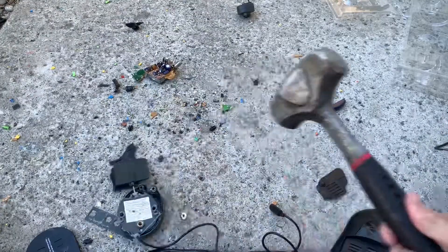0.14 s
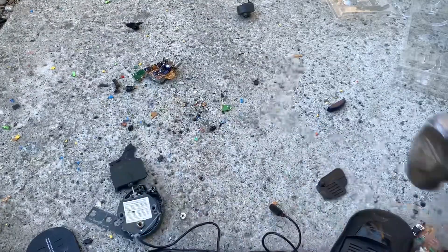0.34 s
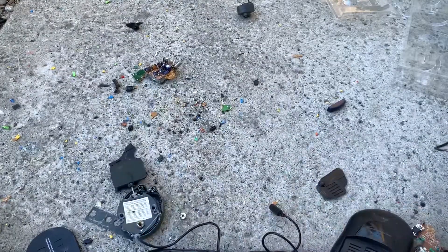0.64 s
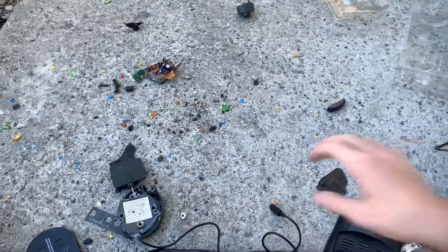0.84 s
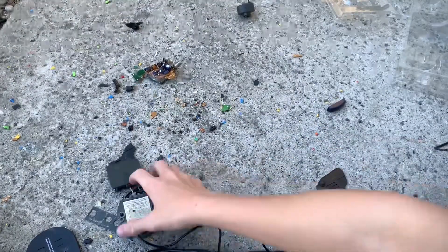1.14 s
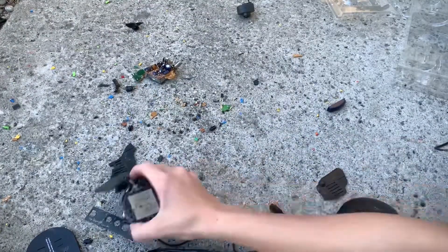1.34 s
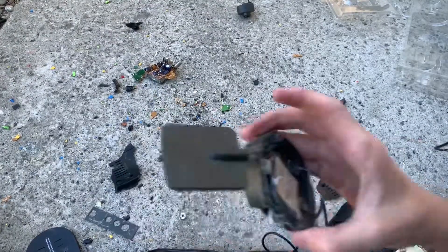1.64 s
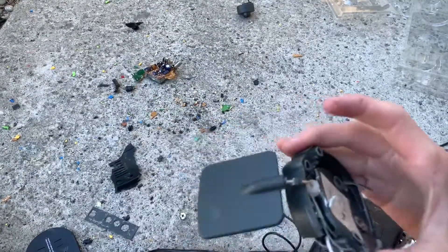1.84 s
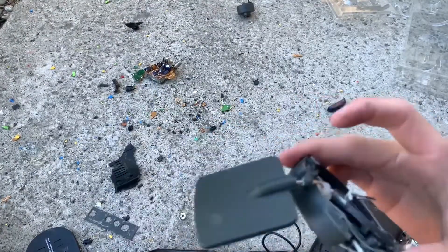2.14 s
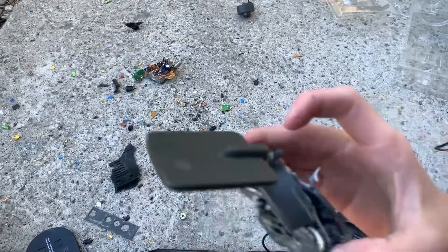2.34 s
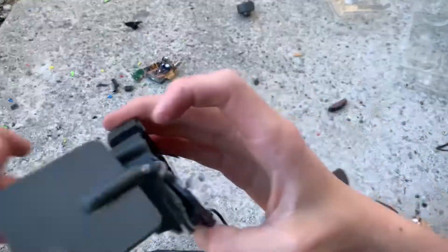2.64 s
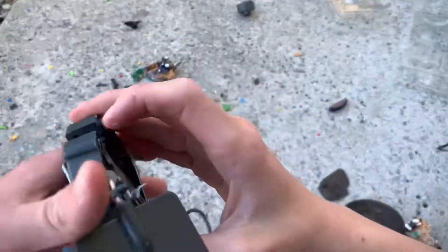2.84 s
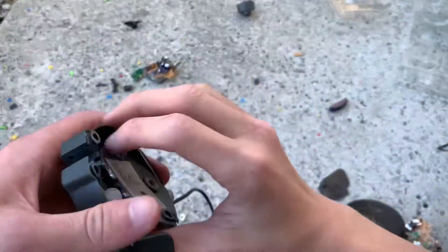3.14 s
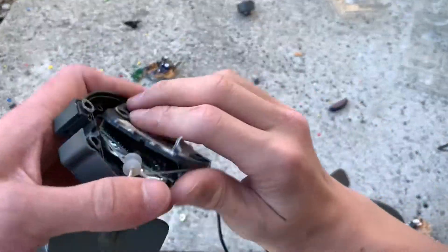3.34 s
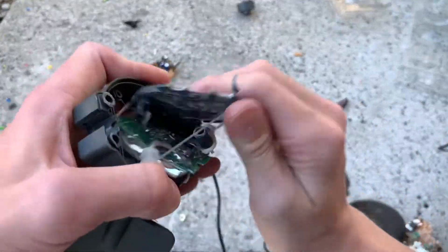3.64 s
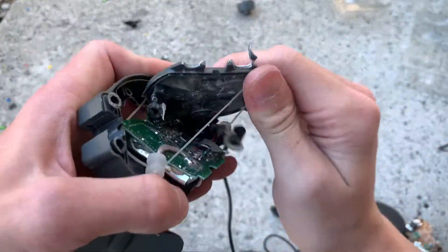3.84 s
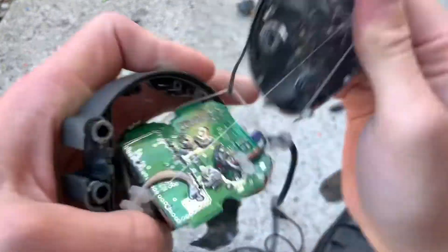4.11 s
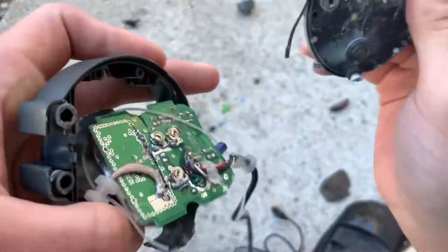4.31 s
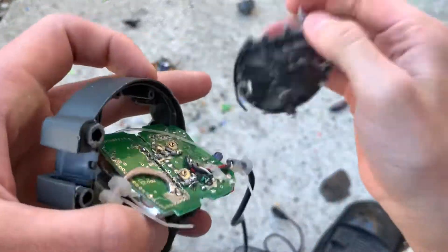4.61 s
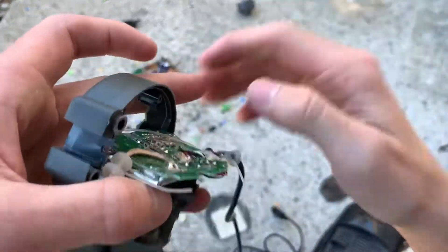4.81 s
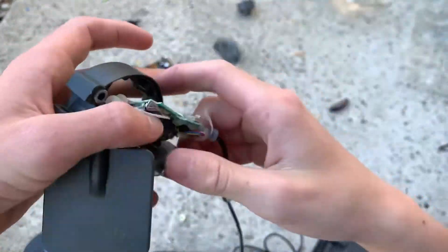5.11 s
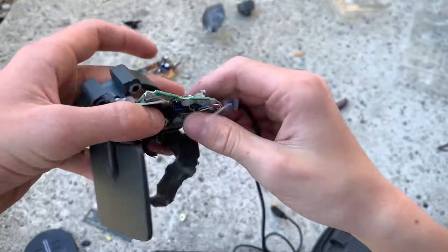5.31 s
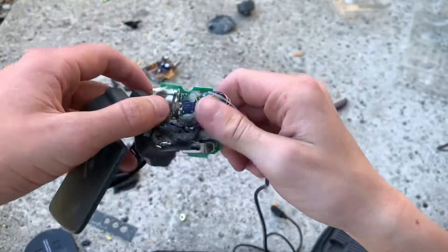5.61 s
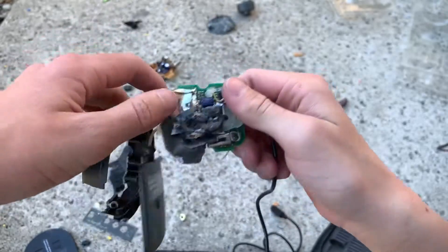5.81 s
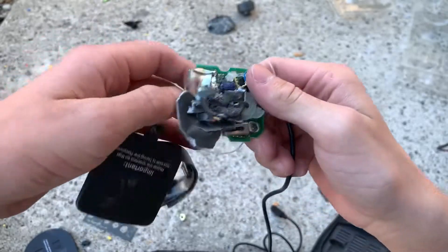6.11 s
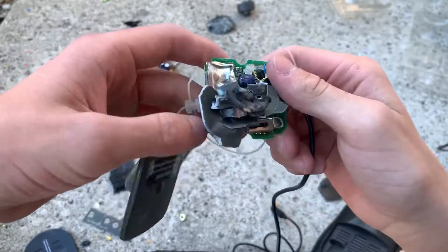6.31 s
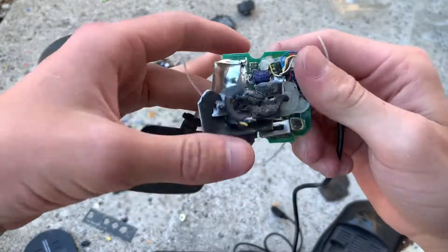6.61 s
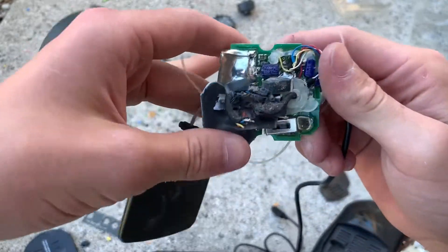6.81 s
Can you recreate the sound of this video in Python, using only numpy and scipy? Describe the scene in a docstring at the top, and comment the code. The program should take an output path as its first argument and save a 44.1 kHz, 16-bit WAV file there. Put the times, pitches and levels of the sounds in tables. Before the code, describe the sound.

A heavy hammer clunks down and scrapes on concrete, then hands rub and crack apart broken plastic, sparrows chirping over distant traffic.

```python
"""Outdoors on concrete, a hammer is laid down and rocks to rest, then two hands pull a smashed gadget apart.
Thuds with falling pitch and ringing steel make the hammer; shaped noise and tiny slips make it drag.
Close by, the plastic housing rubs, clacks and snaps and the circuit board cracks free: short bursts
of noise set panels and shards ringing. Far off, a sparrow's whistled chirps lean to the right, and
traffic rumbles as filtered noise and engine harmonics."""
import sys
import numpy as np
from scipy import signal
from scipy.fft import rfft, irfft
from scipy.io import wavfile

SR = 44100
rng = np.random.default_rng(int(sys.argv[2]) if len(sys.argv) > 2 else 0)


def wav_out(sig):
    """Save sig, one row per channel (or a flat mono array), as 16-bit PCM at SR to the path in sys.argv[1]."""
    wavfile.write(sys.argv[1], SR, np.round(np.clip(np.atleast_2d(sig).T, -1, 1) * 32767).astype(np.int16))


N = 306936
TIME = np.arange(N) / SR
CUTOFF_HZ = 16300   # top of the sound


def from_db(db):
    """Turn decibels into a gain."""
    return 10 ** (np.asarray(db) / 20)


def rms_one(x):
    """Scale a steady sound to an average (RMS) level of 1."""
    return x / np.sqrt(np.mean(x ** 2) + 1e-20)


def unit_hit(x):
    """Scale a hit to the energy of 5 ms at level 1."""
    return x * np.sqrt(.005 * SR / (np.sum(x ** 2) + 1e-20))


def in_time(rows):
    """Join table rows with straight lines over time, one curve per column."""
    s, *columns = np.transpose(rows)
    return [np.interp(TIME, s, c) for c in columns]


def at_hz(rows, hz):
    """Join table rows over frequency on a logarithmic scale, one curve per column."""
    points, *columns = np.transpose(rows)
    return [np.interp(np.log(hz + 1), np.log(points), c) for c in columns]


def colour(x, spectrum):
    """Causal (minimum-phase) filter that follows a spectrum."""
    size = 2048
    level_db = at_hz(spectrum, np.fft.rfftfreq(size, 1 / SR))[0]
    cepstrum = irfft(np.log(from_db(level_db)))
    # folding the cepstrum forward leaves no sound before the hit
    cepstrum[1:size // 2] *= 2
    cepstrum[size // 2 + 1:] = 0
    return signal.fftconvolve(x, irfft(np.exp(rfft(cepstrum))))[:len(x)]


def resonate(x, modes):
    """Resonances side by side, each (pitch [Hz], width [Hz], level [dB]); a narrow one rings longer."""
    out = 0
    for k, (hz, width, db) in enumerate(modes):
        r = np.exp(-np.pi * width / SR)
        gain = (-1) ** k * from_db(db) * (1 - r * r) / 2   # alternate signs
        feedback = [1, -2 * r * np.cos(2 * np.pi * hz / SR), r * r]
        out = out + gain * signal.lfilter([1, 0, -1], feedback, x + 1e-18)
    return out


def drift(rate):
    """Random wander: `rate` normal random values per second, joined by straight lines."""
    return np.interp(TIME * rate, np.arange(4000), rng.standard_normal(4000))


def grains(per_s, spread_db):
    """Tiny slips of uneven size at random moments."""
    sizes = from_db(spread_db * np.minimum(rng.exponential(1, N), 4))
    return rms_one(sizes * rng.standard_normal(N) * (rng.random(N) < per_s / SR))


def burst(run, decay_s, tail_db, tail_s):
    """Dense micro-fractures for `run` seconds, then a fast decay and a faint after-ring."""
    t = TIME[:SR // 8]
    after = np.maximum(t - run, 0)
    fade = np.exp(-after / decay_s) + from_db(tail_db) * np.exp(-after / tail_s)
    return rng.standard_normal(len(t)) * fade


def add(track, s, sound):
    """Mix a sound into a track, starting at s seconds."""
    at = max(round(s * SR), 0)
    track[at:at + len(sound)] += sound[:N - at]


def echoes(x, t60, build_s):
    """Diffuse scatter: noise that builds up and then fades at 60 dB per `t60` seconds."""
    t = TIME[:SR // 2]
    tail = rng.standard_normal(len(t)) * from_db(-60 * t / t60) * (1 - np.exp(-t / build_s))
    return signal.fftconvolve(x, tail / np.sqrt(np.sum(tail ** 2)))[:N]


def strokes(rows, attack_s, release_s):
    """Loudness of rubbing strokes, one curve per level column: each rises, holds and dies away."""
    power = 0
    for s, length, *levels in rows:
        rise = np.clip((TIME - s) / attack_s, 0, 1)
        fall = np.exp(-np.clip((TIME - s - length) / release_s, 0, 20))
        power = power + np.outer(from_db(levels), rise * fall) ** 2
    return np.sqrt(power)


def rasp(count=16):
    """Dense slips whose colour keeps shifting as the contact point wanders."""
    out, edges = 0, np.linspace(1000, CUTOFF_HZ, count + 1)
    slips = [grains(per_s=9000, spread_db=2.5) for _ in range(2)]
    for k, band in enumerate(zip(edges, edges[1:])):
        band_filter = signal.butter(2, band, "band", fs=SR, output="sos")
        out = out + signal.sosfilt(band_filter, slips[k % 2]) * from_db(4.5 * drift(45))
    return out


def engine(curve, orders):
    """The firing harmonics of a far engine, wavering in pitch and each drifting in level."""
    hz, db = in_time(curve)
    phase = 2 * np.pi * np.cumsum(hz * (1 + .022 * drift(30))) / SR
    harmonics = 0
    for k, level in orders:
        harmonics = harmonics + np.sqrt(2) * from_db(level + 3 * drift(14)) * np.sin(k * phase)
    return from_db(db) * harmonics


# distant traffic rumble: (time [s], level [dB])
TRAFFIC = [(0, -55.5), (0.4, -61), (1.1, -51.5), (1.72, -57.5), (1.82, -50.5), (3.3, -47), (4.1, -53),
           (5.93, -61.5), (6.0, -43.5), (6.35, -49), (6.96, -52)]
# spectra of the rumble and of the open air: (frequency [Hz], relative level [dB])
TRAFFIC_COLOUR = [(30, -20.5), (55, -6.5), (108, 0), (155, -10.5), (200, -22), (400, -30), (600, -50),
                  (3000, -100)]
AIR_COLOUR = [(320, 26.5), (550, 15.5), (900, 10.5), (2000, -6.5), (3500, -5.5), (6000, -9.5), (15000, -18)]
# an accelerating engine and a slow heavy one: (time [s], firing rate [Hz], level [dB])
ENGINE = [(1.5, 118.6, -72), (2.5, 123.5, -62.5), (3.3, 135.8, -81.5), (3.6, 144, -59), (4.1, 160, -56.5),
          (4.7, 172.1, -65.5), (5.9, 180.7, -83.5)]
DRONE = [(3.5, 42, -90.5), (3.8, 41, -68.5), (5.0, 40.84, -68.5), (6.4, 40.06, -53), (6.96, 41.29, -51)]
# harmonics of each: (multiple of firing rate, level [dB])
ENGINE_ORDERS = [(1, 0.5), (2, -3), (3, -20.5), (4, -27.5), (5, -33)]
DRONE_ORDERS = [(1, -4.5), (2, -2.5), (4, -19)]


def street(air_db=-72, low_cut_hz=50, surge_db=2):
    """Surging traffic rumble, two engines and a steady wash of open air, from noise and harmonics."""
    gain = from_db(at_hz(TRAFFIC_COLOUR, np.fft.rfftfreq(N, 1 / SR))[0])
    rumble = irfft(rfft(rng.standard_normal(N)) * gain, N)
    rumble = signal.sosfilt(signal.butter(4, low_cut_hz, "high", fs=SR, output="sos"), rumble)
    rumble = rms_one(rumble * from_db(surge_db * drift(19)))
    traffic = from_db(in_time(TRAFFIC)[0]) * rumble
    air = from_db(air_db) * rms_one(colour(rng.standard_normal(N), AIR_COLOUR))
    return traffic + air + engine(ENGINE, ENGINE_ORDERS) + engine(DRONE, DRONE_ORDERS)


# pitch arch of one syllable: (share of its length, share of top pitch)
SYLLABLE = [(0, .8), (.2, .91), (.38, 1), (.55, .98), (.76, .89), (1, .84)]
TRILL_HZ = 93.6


def syllable(top_hz, length, trill=0, second_voice_db=-19):
    """A ragged whistle that swells as it arches over; it may trill, with a weaker voice above it."""
    u = np.linspace(0, 1, round(length * SR))
    knots = np.linspace(0, 1, 20)
    wobble, flutter = [np.interp(u, knots, rng.standard_normal(20)) for _ in range(2)]
    bend = 1 + .018 * wobble + trill * np.sin(2 * np.pi * TRILL_HZ * length * u)
    arch = np.interp(u, *np.transpose(SYLLABLE))
    phase = 2 * np.pi * np.cumsum(top_hz * arch * bend) / SR
    voices = np.sin(phase) + from_db(second_voice_db) * np.sin(1.17 * phase)
    swell = np.sqrt(u * np.abs(np.sin(np.pi * u)))
    return rms_one(voices * swell * from_db(3.5 * flutter))


# full sparrow calls: (time [s], top pitch before bending [Hz], relative level [dB])
CHIRPS = [(1.246, 4585, -61), (2.642, 4820, -62.5), (4.366, 4494, -59.5), (5.227, 4670, -61.5),
          (6.546, 4566, -55.5)]
# the three falling syllables of a call:
# (delay [s], length [s], share of top pitch, level [dB], trill depth as a share of pitch)
CALL = [(0, .038, 1, -2, .01), (.042, .038, .82, 0, .015), (.074, .03, .73, -6, .11)]
# single notes, near and far: (time [s], length [s], top pitch before bending [Hz], level [dB])
PEEPS = [(2.329, .08, 3510, -84.5), (2.776, 0.034, 5300, -69), (2.806, 0.032, 6350, -65),
         (2.828, 0.041, 4840, -63.5), (2.891, 0.022, 6300, -67), (5.381, 0.091, 6340, -66),
         (5.396, 0.053, 5420, -63.5), (6.78, 0.045, 3726, -78.5)]


def sparrows(call_db=-2, wet_db=-10):
    """Whistled calls and single notes, all blurred by echoes from the walls around."""
    out = np.zeros(N)
    for s, top_hz, db in CHIRPS:
        for delay, length, share, step_db, trill in CALL:
            note = syllable(top_hz * share, length, trill)
            add(out, s + delay, from_db(db + step_db + call_db) * note)
    for s, length, top_hz, db in PEEPS:
        add(out, s, from_db(db) * syllable(top_hz, length))
    out = out + from_db(-5) * echoes(out, t60=.1, build_s=.002)
    return out + from_db(wet_db) * echoes(out, t60=.42, build_s=.004)


def grit(low_hz, high_hz, per_s, cycles, count):
    """Separate grains, each ringing briefly at one of `count` pitches."""
    out = 0
    for hz in np.geomspace(low_hz, min(high_hz, CUTOFF_HZ), count):
        out = out + rms_one(resonate(grains(per_s / count, 3), [(hz, hz / cycles, 0)]))
    return rms_one(out)


# the hammer dragging on rough concrete:
# (time [s], length [s], relative grinding level [dB], relative hiss level [dB])
DRAGS = [(0.675, 0.068, -42, -45), (0.78, 0.18, -57.5, -61.5), (0.97, 0.19, -52.5, -66.5),
         (1.2, 0.018, -47, -58.5), (1.31, 0.01, -56.5, -85)]
# spectra of the dull scuff and of sliding hiss: (frequency [Hz], relative level [dB])
SCUFF_COLOUR = [(60, -17.5), (150, 4.5), (330, 2.5), (650, 2.5), (1000, -11), (1900, -12.5), (3200, -17),
                (6000, -38), (12000, -35.5)]
SLIDE_COLOUR = [(100, -33.5), (600, -10.5), (2000, -12.5), (4000, -9.5), (5500, -8.5), (7500, -2),
                (11000, -4.5), (15000, -12.5)]   # also colours the plastic slides


def drags(grind_db=-1, hiss_db=-1, grit_db=-7, judder_db=4):
    """Steel juddering over concrete: dull grinding, separate grains of grit and a rasp."""
    grinding, speed = strokes(DRAGS, attack_s=.0031, release_s=.031)
    scuff = rms_one(colour(grains(per_s=650, spread_db=2.0), SCUFF_COLOUR))
    sand = grit(900, 5000, per_s=330, cycles=30, count=14)
    hiss = rms_one(colour(rasp(), SLIDE_COLOUR))
    judder = rms_one(from_db(judder_db * drift(90)))
    grind = from_db(grind_db) * grinding * (scuff + from_db(grit_db) * sand)
    return judder * (grind + from_db(hiss_db) * speed * hiss)


# heavy knocks on the ground: (time [s], starting pitch [Hz], thud level [dB],
# relative level of clatter and ring [dB], shudder relative to the thud [dB])
KNOCKS = [(0.453, 513, -51.5, -61.5, 1), (0.515, 864, -41.5, -47, 5), (0.6648, 759, -14.5, -20, -7.5),
          (0.695, 640, -40, -45, -12), (0.7441, 780.5, -28.5, -38, -0.5),
          (0.9412, 535, -24.5, -54.5, -12.5), (0.976, 674, -23, -31.5, -7.5), (1.022, 620, -32, -48, -9),
          (1.052, 670, -26, -47, -6.5), (1.082, 500, -50, -45, -7), (1.115, 700, -27, -38.5, -2),
          (1.199, 425, -32.5, -36, 6), (1.316, 600, -35, -51.5, 3), (1.357, 583, -38.5, -77, 3.5)]
# ring of the hammer head: (pitch [Hz], width [Hz], level before random scatter [dB])
HAMMER_MODES = [(648, 10, 6.5), (1330, 30, -6), (1940, 18, -5.5), (3200, 80, -13)]
# spectrum of the clatter: (frequency [Hz], relative level [dB])
CLATTER = [(50, -33.5), (300, -4), (650, 7), (1150, 0.5), (1900, 0.5), (2800, -13), (5000, -32.5),
           (16000, -47)]


def knocks(low_hz=95, high_hz=280, fall_s=.0031, swell_s=.0029, ring_db=-12):
    """A thud of falling pitch, a low shudder, a clatter and a ring that varies with the contact point."""
    out, t = np.zeros(N), TIME[:SR // 8]
    band = signal.butter(2, [low_hz, high_hz], "band", fs=SR, output="sos")
    swell = t / swell_s * np.exp(-t / swell_s)
    for s, hz, low, hard, shudder_db in KNOCKS:
        # the logarithm makes the pitch drop ever more slowly
        thud = unit_hit(swell * np.sin(2 * np.pi * hz * fall_s * np.log1p(t / fall_s)))
        shaking = burst(.012, decay_s=.018, tail_db=-18, tail_s=.037) * np.clip(t / .0035, 0, 1)
        shudder = unit_hit(signal.sosfilt(band, shaking))
        contact = burst(.002, decay_s=.002, tail_db=-21, tail_s=.02)
        clatter = unit_hit(colour(contact, CLATTER))
        struck = [(mode_hz, width, db + 4 * rng.standard_normal()) for mode_hz, width, db in HAMMER_MODES]
        ring = unit_hit(resonate(burst(.001, decay_s=.001, tail_db=-30, tail_s=.01), struck))
        add(out, s, from_db(low) * thud + from_db(low + shudder_db) * shudder)
        add(out, s, from_db(hard) * (clatter + from_db(ring_db) * ring))
    return out


def crackle(per_s, clump_db, width_hz=330, count=10):
    """Edges catch and let go in clusters of tiny clicks; each edge rings at pitches of its own."""
    rate = per_s / count * from_db(clump_db * np.minimum(drift(22), 1.5))
    choices = np.geomspace(1300, 14000, 200)   # possible pitches, Hz
    ticks = 0
    for pitches in choices[rng.integers(0, 200, (count, 5))]:
        slip = burst(.0008, decay_s=.0012, tail_db=-26, tail_s=.006)
        ring = resonate(slip, [(hz, width_hz, 0) for hz in pitches])
        click = unit_hit(slip) / 2 + unit_hit(ring)
        ticks = ticks + signal.fftconvolve(grains(rate, 2.5), click)[:N]
    return rms_one(colour(ticks, SLIDE_COLOUR))


# plastic parts sliding over each other:
# (time [s], length [s], relative hiss level [dB], hollow rub level [dB])
SLIDES = [(0.0, 0.02, -45, -54), (0.05, 0.13, -62.5, -58.5), (0.2, 0.027, -95, -66),
          (2.71, 0.028, -72, -99), (2.88, 0.07, -64, -76), (2.96, 0.019, -64, -91),
          (3.24, 0.062, -77, -69.5), (3.595, 0.035, -53.5, -78), (4.02, 0.089, -54.5, -81),
          (4.35, 0.014, -56.5, -68.5), (4.55, 0.038, -62, -73.5), (4.82, 0.011, -47.5, -53),
          (4.88, 0.15, -69, -71), (5.12, 0.062, -63.5, -61.5), (5.2, 0.037, -56, -55),
          (5.35, 0.17, -67, -75.5), (5.57, 0.092, -60.5, -95), (5.64, 0.039, -45, -59),
          (5.84, 0.03, -52, -51.5), (5.938, 0.031, -48, -59.5), (6.03, 0.027, -51.5, -48.5),
          (6.11, 0.045, -61.5, -55.5), (6.19, 0.096, -69.5, -66.5)]
# how busily the parts are handled: (time [s], relative level of the light rustle [dB])
HANDLING = [(0, -66), (1.2, -68), (1.36, -85.5), (1.72, -73), (1.85, -100), (2.2, -85), (2.4, -78.5),
            (3.12, -67), (3.4, -73), (3.95, -80), (4.15, -70.5), (5.9, -62.5), (6.45, -78), (6.96, -78.5)]
# resonances of the rubbed housing: (pitch [Hz], width [Hz], level [dB])
RUB_MODES = [(1425, 65, -4.5), (1867, 52, 3.5), (3900, 120, -13), (4300, 120, -17)]


def friction(slide_db=-4, crackle_db=-3, rustle_db=-9, tick_db=-3):
    """Plastic on plastic: bright slips, fine crackle, a hollow rub, and edges that catch when turned."""
    slide, press = strokes(SLIDES, attack_s=.0047, release_s=.015)
    handling = from_db(in_time(HANDLING)[0])
    hiss = rms_one(colour(rasp() * from_db(3.5 * drift(70)), SLIDE_COLOUR))
    rub_slips = grains(per_s=1100, spread_db=1.0) * from_db(4 * drift(90))
    rub = rms_one(resonate(rub_slips, RUB_MODES))
    fine_crackle = crackle(per_s=330, clump_db=2.5)
    catches = crackle(per_s=110, clump_db=8)
    sliding = slide * (from_db(slide_db) * hiss + from_db(crackle_db) * fine_crackle)
    rustle = handling * (from_db(rustle_db) * hiss + from_db(tick_db) * catches)
    return sliding + press * rub + rustle


LARGE_PANEL_HZ, SMALL_PANEL_HZ = 1275.5, 1848   # lowest modes of the two housing panels
# loose parts hitting the housing:
# (time [s], panel pitch before the grip shifts it [Hz], relative ring level [dB], tick level [dB])
CLACKS = [(0.3146, LARGE_PANEL_HZ, -44.5, -47.5), (0.365, LARGE_PANEL_HZ, -48, -52),
          (2.994, SMALL_PANEL_HZ, -61, -55), (4.46, SMALL_PANEL_HZ, -62.5, -62.5),
          (4.817, LARGE_PANEL_HZ, -37, -33.5), (4.837, LARGE_PANEL_HZ, -42.5, -46.5),
          (4.981, LARGE_PANEL_HZ, -54.5, -49.5), (5.032, SMALL_PANEL_HZ, -58, -68),
          (5.0922, LARGE_PANEL_HZ, -47.5, -48), (5.3255, LARGE_PANEL_HZ, -50, -46.5),
          (5.343, LARGE_PANEL_HZ, -46.5, -43.5), (5.39, LARGE_PANEL_HZ, -54.5, -60),
          (5.463, LARGE_PANEL_HZ, -48.5, -48), (5.477, LARGE_PANEL_HZ, -49.5, -44.5),
          (5.552, LARGE_PANEL_HZ, -59, -60), (5.58, LARGE_PANEL_HZ, -59, -56.5),
          (5.717, SMALL_PANEL_HZ, -50, -52), (5.842, SMALL_PANEL_HZ, -54.5, -60),
          (5.87, SMALL_PANEL_HZ, -53, -55), (6.035, SMALL_PANEL_HZ, -35.5, -78),
          (6.121, SMALL_PANEL_HZ, -57, -59.5)]
# resonances of the whole shell: (pitch [Hz], width [Hz], level [dB])
HOUSING_MODES = [(880, 83, -3), (1360, 75, 10.5), (1860, 50, -2), (2270, 146, 6), (3110, 51, -12),
                 (3320, 67, -3)]
# spectrum of the contact tick: (frequency [Hz], relative level [dB])
TICK = [(200, 3), (500, 5.5), (1200, -12.5), (2500, -3), (3700, 2), (5000, -13), (8000, 4), (11000, -5),
        (16000, -8)]


def clacks(ring_db=-1, ring_width_hz=72, shell_db=-1, grip_scatter=.016):
    """A sharp contact, then the hollow ring of the struck panel and of the whole shell."""
    out, push = np.zeros(N), signal.unit_impulse(SR // 8)
    for s, hz, ring, tick in CLACKS:
        contact = burst(.0015, decay_s=.0018, tail_db=-22, tail_s=.01)
        hz = hz * (1 + grip_scatter * rng.standard_normal())   # the grip shifts the panel's pitch
        panel = unit_hit(resonate(push, [(hz, ring_width_hz, 0), (hz * 2.088, 130, -7)]))
        shell = unit_hit(resonate(contact, HOUSING_MODES))
        add(out, s, from_db(ring + ring_db) * (panel + from_db(shell_db) * shell))
        add(out, s, from_db(tick) * unit_hit(colour(contact, TICK)))
    return out


# brittle cracks and ticks: (time [s], time the crack runs [s], shard pitch [Hz],
# bright level [dB], body level [dB])
SNAPS = [(0.0085, 0.00041, 8770, -38.5, -45), (0.02, 0.0038, 7300, -64.5, -46),
         (0.053, 0.0022, 12600, -51, -58.5), (0.326, 0.00027, 13160, -32, -54),
         (0.4035, 0.00077, 7200, -51, -58), (0.513, 0.0011, 10300, -30, -38.5),
         (0.5348, 0.0031, 7450, -48.5, -45.5), (0.5878, 0.001, 13800, -52.5, -67),
         (0.622, 0.002, 7300, -49.5, -64.5), (0.664, 0.0041, 7600, -28.5, -43.5),
         (0.8051, 0.0017, 3180, -69, -48.5), (0.856, 0.001, 8200, -48, -61),
         (0.8731, 0.001, 8900, -46.5, -52.5), (0.937, 0.0024, 11200, -42.5, -59),
         (1.1979, 0.0021, 11700, -45, -56.5), (1.5773, 0.001, 8000, -62.5, -74.5),
         (1.6936, 0.00092, 10840, -50.5, -74), (1.7514, 0.002, 7500, -61, -77),
         (2.489, 0.001, 9100, -57, -73), (2.8721, 0.0012, 7400, -45.5, -56),
         (2.919, 0.003, 6300, -55.5, -55), (3.037, 0.002, 11160, -48.5, -55),
         (3.2044, 0.00092, 9800, -64, -71.5), (3.2234, 0.0037, 7300, -50.5, -53.5),
         (3.2785, 0.001, 7600, -49, -55), (3.296, 0.001, 6870, -56, -58.5),
         (3.4255, 0.0046, 9100, -46, -56), (3.592, 0.0039, 9200, -43.5, -47),
         (3.6243, 0.0034, 12000, -48.5, -50), (4.0047, 0.001, 13600, -44.5, -59),
         (4.0354, 0.0047, 7220, -11, -16), (4.055, 0.0015, 11300, -36.5, -43),
         (4.0786, 0.003, 12500, -45, -56), (4.1, 0.001, 9070, -29.5, -42.5),
         (4.3526, 0.0039, 13600, -46.5, -60), (4.505, 0.002, 8000, -59, -75),
         (4.5325, 0.001, 13200, -46.5, -60), (4.6745, 0.002, 12270, -53.5, -63.5),
         (4.9082, 0.0024, 9600, -47.5, -61), (5.004, 0.0048, 7400, -49.5, -50),
         (5.169, 0.0038, 7840, -54.5, -69.5), (5.271, 0.003, 8600, -57, -59),
         (5.637, 0.012, 13100, -39, -39.5), (5.647, 0.01, 3460, -42, -34.5),
         (5.6519, 0.0012, 13300, -20.5, -40.5), (5.795, 0.001, 9400, -49, -66),
         (5.84, 0.0045, 6400, -46, -53), (5.8764, 0.0018, 10600, -47, -56),
         (5.921, 0.001, 11070, -40.5, -64.5), (6.037, 0.0085, 6550, -31.5, -37.5),
         (6.3647, 0.0005, 7180, -45, -48)]
# resonances of a shard: (multiple of its pitch, width [Hz], level before random scatter [dB])
SHARD_MODES = [(.55, 159, -13.5), (.65, 140, -8), (.803, 110, -5.5), (.853, 100, -3), (1, 110, 1),
               (1.074, 80, -6.5), (1.212, 110, -5), (1.39, 130, -5.5), (1.516, 130.5, -11.5),
               (1.71, 171, -8)]
# spectra of the bright part and of the body: (frequency [Hz], relative level [dB])
CRACK_TOP = [(4500, -40.5), (6500, -7.5), (8000, 4.5), (11000, 4), (16000, -2)]
CRACK_BODY = [(150, -11), (270, 3), (500, -10), (750, -14), (1350, -6), (1950, -14.5), (3800, -0.5),
              (6000, -0.5), (7500, -1), (10000, -42.5)]


def snaps(shard_db=-6, mode_scatter_db=1):
    """A crack runs through brittle plastic, or a bit of debris ticks under the dragged hammer, and sets a shard
    ringing, each at a pitch of its own."""
    out = np.zeros(N)
    for s, run, hz, top, body in SNAPS:
        crack = burst(run, decay_s=.0009, tail_db=-30, tail_s=.009)
        modes = []
        for ratio, width, db in SHARD_MODES:
            extra = mode_scatter_db * rng.standard_normal()
            if hz * ratio < CUTOFF_HZ:
                modes.append((hz * ratio, width, db + extra))
        crack = unit_hit(crack) + from_db(shard_db) * unit_hit(resonate(crack, modes))
        add(out, s, from_db(top) * unit_hit(colour(crack, CRACK_TOP)))
        add(out, s, from_db(body) * unit_hit(colour(crack, CRACK_BODY)))
    return out


# the microphone pair:
# (frequency [Hz], left minus right [dB], left lead [rad], relative diffuse side level [dB])
PORTS = [(101, -0.5, -0.96, -26.5), (327, 0.5, -0.5, -22), (686, -13.5, 0.7, -15), (1010, -5, 1.7, -7),
         (1300, 0, 1.28, -5.5), (1950, -10.5, 1.6, -6.5), (2660, -10, 1, -5), (3950, -10.5, 1.1, -10),
         (5300, -5.5, 1.53, -9), (6500, -6.5, 1.24, -9.5), (7300, -1, 0.5, -22), (10500, -0.35, -0.45, -23),
         (14500, 0, -1.3, -15)]


def microphones(x):
    """Two ports hear unequal level and phase; scatter off the hands parts them in the middle band."""
    balance, lead, diffuse = at_hz(PORTS, np.fft.rfftfreq(N, 1 / SR))
    ratio = from_db(balance) * np.exp(1j * lead)   # left over right
    scatter = .7 * echoes(x, t60=.025, build_s=.0002) + echoes(x, t60=.12, build_s=.002) / 4
    direct_side = rfft(x) * (ratio - 1) / (ratio + 1)
    side = irfft(direct_side + rfft(scatter) * from_db(diffuse), N)
    return np.array([x + side, x - side])


def scene(yard_db=-26, around_db=-16):
    """Mix the near and far sources, with echoes off the ground and walls, into stereo."""
    far = sparrows() + street()
    near = drags() + knocks() + friction() + clacks() + snaps()
    near = near + from_db(yard_db) * echoes(near, t60=.14, build_s=.0031)
    # distant sound arrives from all around, so part of it differs between the ears
    around = from_db(around_db) * echoes(far, t60=.5, build_s=.01) * np.array([[1], [-1]])
    return microphones(near + far) + around


def record(dry):
    """The loudest peaks are rounded and the top is cut."""
    rounded = .85 * np.tanh(dry / .85)
    return signal.sosfilt(signal.cheby1(10, .3, CUTOFF_HZ, fs=SR, output="sos"), rounded)


dry = scene()
out = record(dry)
wav_out(out)
```